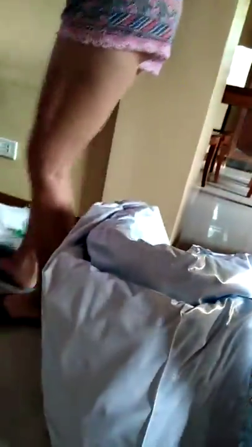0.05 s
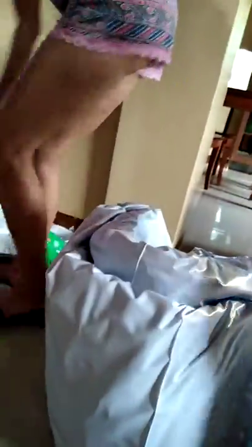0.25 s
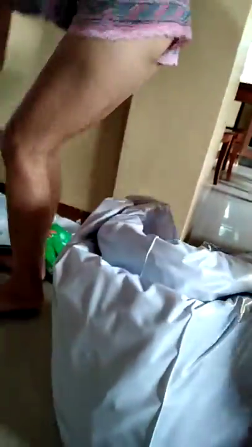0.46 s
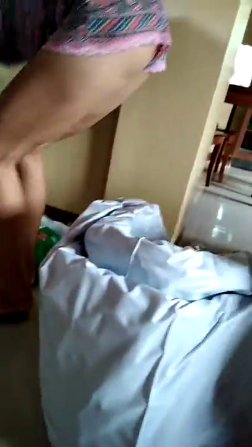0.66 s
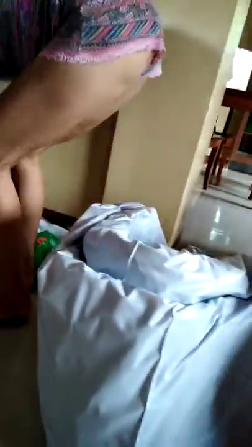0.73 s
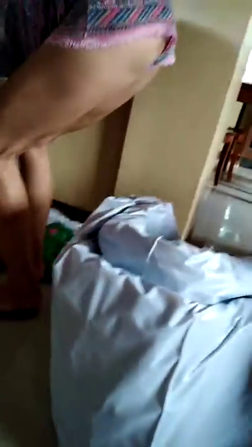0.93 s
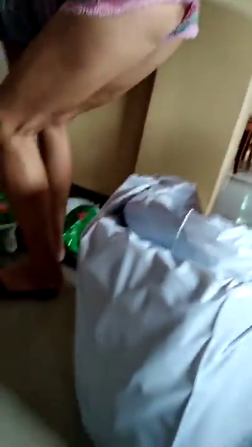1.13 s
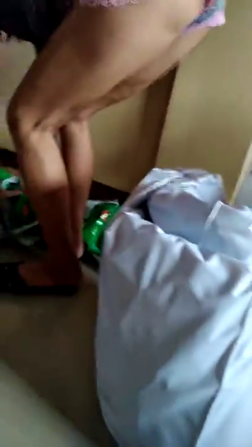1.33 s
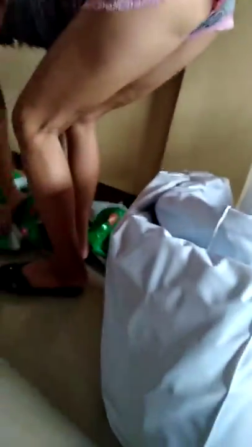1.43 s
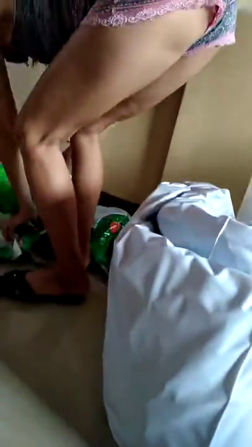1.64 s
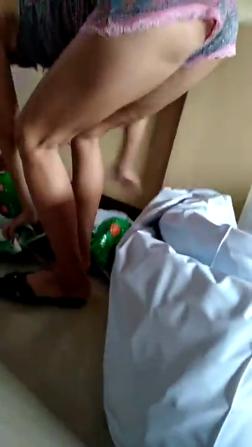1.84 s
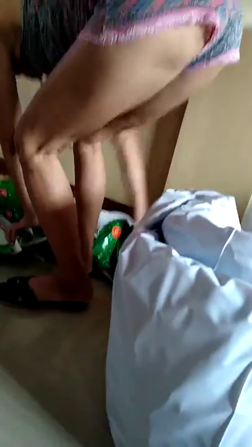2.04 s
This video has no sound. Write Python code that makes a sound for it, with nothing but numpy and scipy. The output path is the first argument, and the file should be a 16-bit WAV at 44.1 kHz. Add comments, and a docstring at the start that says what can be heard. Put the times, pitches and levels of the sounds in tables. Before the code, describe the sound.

Thick folded plastic crackles brightly from the start, with a sharp, ringing snap and low thump at 0.21 s. A smaller rustle around 0.4-0.5 s dies to near silence by 0.65 s; a faint tap at 0.72 s. From 0.83 s a long crinkling drag swells, loudest at 1.05-1.45 s with crease clicks and soft flops, a low wobble near 1.5-1.65 s, then thins, with a last click at 2.0 s. Close, short hard-room reflections, faint rumble.

```python
"""A bright crackling rustle of thick folded plastic in a tiled room, then a sharp ringing snap.
The rustle dies to near silence, a faint tap sounds, and it returns as a long drag with creases,
soft thumps and one low wobble. Rustle, snap, creases and rumble are shaped noise with crackles in
the rustle; thumps, wobble, tap and the fold's ringing are sines. Short reflections colour the
rustle and the snap; a faint low rumble lies under everything."""
import sys
import numpy as np
from scipy import signal
from scipy.fft import rfft, irfft
from scipy.io import wavfile
from scipy.ndimage import uniform_filter1d

SR = 44100
rng = np.random.default_rng(int(sys.argv[2]) if len(sys.argv) > 2 else 0)


def int16_out(signal):
    """Quantize to a 16-bit WAV file."""
    q = np.round(np.clip(np.atleast_2d(signal).T, -1, 1) * 32767)
    wavfile.write(sys.argv[1], SR, q.astype(np.int16))


N = 91728
T = np.arange(N) / SR
HZ = np.fft.rfftfreq(N, 1 / SR)
BASS_HZ = 500

# colour of the plastic sheet: freq_hz, relative_db_per_hz
SHEET_COLOUR = [(59, -52.5), (100, -20), (151, 3), (307, 0), (386, -11.5), (428, -8.5), (516, -11),
                (648, -1.5), (1040, -9), (1830, -3.5), (3270, -11), (8690, 1), (14300, -21.5)]


def amp(db):
    """Decibels to gain."""
    return 10 ** (np.asarray(db) / 20)


def evened(x):
    """Scales to rms 1."""
    return x / np.sqrt(np.mean(x ** 2) + 1e-20)


def read(points, hz):
    """Interpolates a table on a log-frequency axis."""
    f, value = np.transpose(points)
    return np.interp(np.log(hz + 1), np.log(f + 1), value)


def struck(start_s, rise_s, t60_s):
    """Envelope: linear rise times exponential decay."""
    since_s = np.maximum(T - start_s, 0)
    return np.minimum(since_s / rise_s, 1) * amp(-60 * since_s / t60_s)


def ports(pair, gain):
    """Colours two noise streams and blends them as two microphones hear them."""
    # left-right likeness: freq_hz, likeness_0_to_1
    likeness = [(60, 0.4), (150, 1), (380, 0.79), (940, 0.35), (2350, 0.27), (5870, 0), (14700, 0.46)]
    # left minus right: freq_hz, difference_db
    side_tilt = [(60, -2), (92, 4), (140, 0), (210, 7), (330, 2.5), (500, 3), (760, 1), (1160, 7.5),
                 (1770, 5), (2700, 1.5), (4130, 1.5), (6300, -2), (9620, 10), (14700, 14.5)]
    a, b = rfft(pair) * gain
    same = np.clip(read(likeness, HZ), -1, 1)
    tilt = amp(read(side_tilt, HZ) / 2)
    left = a * tilt
    right = (same * a + np.sqrt(1 - same ** 2) * b) / tilt
    return irfft([left, right], N)


def walls():
    """Direct sound plus decaying close reflections, as a frequency response per side."""
    echo_t60_s, echo_db, first_echo_s = 0.15, 2.25, .002
    t = T[:12000]
    tail = rng.standard_normal((2, 12000)) * amp(-60 * t / echo_t60_s) * (t > first_echo_s)
    return 1 + amp(echo_db) * rfft(tail / np.linalg.norm(tail[0]), N)


def rustle():
    """Small crackles over a diffuse wash, patchy and flickering, levelled in three bands."""
    # band levels over time: time_s, treble_db, middle_db, bass_db
    band_levels = [
        [(0.0, -22.5, -30.5, -85), (0.014, -25, -38, -54), (0.05, -23.5, -40.5, -73),
         (0.078, -28.5, -35.5, -49), (0.098, -27, -40.5, -60), (0.132, -32, -41.5, -59),
         (0.15, -36, -30.5, -38), (0.162, -31, -38.5, -48), (0.172, -33.5, -28.5, -57), (0.19, -38.5, -40, -67),
         (0.2, -35, -42.5, -48.5)],
        [(0.3, -51, -27.5, -44), (0.318, -49, -40, -50), (0.35, -46, -42, -52), (0.384, -34, -40, -56),
         (0.416, -35, -46, -51), (0.432, -29.5, -42, -48), (0.448, -38.5, -37, -43.5),
         (0.49, -42.5, -48.5, -56), (0.512, -48.5, -49.5, -57.5), (0.596, -54, -64, -64),
         (0.62, -59.5, -70, -79)],
        [(0.64, -56, -85, -62), (0.65, -57.5, -80, -75)],
        [(0.75, -82.5, -79.5, -77.5), (0.812, -83, -83, -101)],
        [(0.826, -31.5, -37, -61), (0.832, -36, -43, -54.5), (0.868, -37, -42, -40.5),
         (0.936, -32.5, -36.5, -48), (1.034, -26, -38, -48.5), (1.048, -26, -30, -57), (1.07, -22.5, -34, -49),
         (1.192, -23, -28, -39), (1.214, -23.5, -38.5, -43), (1.226, -23.5, -33.5, -43),
         (1.254, -29.5, -29, -37), (1.298, -25.5, -30.5, -41.5), (1.378, -23.5, -29.5, -31),
         (1.4, -23, -31, -41)],
        [(1.42, -27, -36, -35.5), (1.436, -25.5, -39, -52), (1.446, -27, -29.5, -44), (1.49, -30, -40, -41.5),
         (1.65, -29, -30, -45), (1.696, -35.5, -38.5, -39), (1.716, -33, -38, -47), (1.792, -41, -44, -51),
         (1.814, -42, -38.5, -47), (1.828, -46.5, -43.5, -50.5), (1.966, -46, -51, -60.5),
         (2.004, -38, -43.5, -59), (2.032, -46, -47, -64), (2.08, -46.5, -48, -70)],
    ]
    treble_hz, low_cut_hz = 4000, 163.0
    crackle_db, patch_db, flicker_db = -1.5, 0.5, 0.5
    shifts_per_s = 0.881  # the moving sheet trades one reflection pattern for another

    drive = rng.standard_normal((2, N)) + amp(crackle_db) * crackles()
    z = signal.stft(drive, nperseg=256, noverlap=192)[2]
    patches = rng.standard_normal(z.shape[:0:-1])  # frames by frequencies
    patches = uniform_filter1d(uniform_filter1d(patches, 30, 0), 6, 1)
    patches = evened(patches).T
    flicker = evened(uniform_filter1d(rng.standard_normal(z.shape[2]), 14))
    z = z * amp(patch_db * patches + flicker_db * flicker)
    drive = signal.istft(z, nperseg=256, noverlap=192)[1][:, :N]

    echoed = np.zeros((2, N))
    for k in range(3):
        weight = np.cos(np.pi * (shifts_per_s * T + k / 3))
        echoed += irfft(rfft(drive * weight) * walls(), N)

    bass = 1 / (1 + (HZ / BASS_HZ) ** 4)
    treble = 1 - 1 / (1 + (HZ / treble_hz) ** 4)
    low_cut = HZ ** 4 / (HZ ** 4 + low_cut_hz ** 4)
    bands = treble, 1 - treble - bass, bass * low_cut
    time_s, *levels_db = np.vstack(band_levels).T
    colour = amp(read(SHEET_COLOUR, HZ))
    out = np.zeros((2, N))
    for band, level_db in zip(bands, levels_db):
        out += evened(ports(echoed, colour * band)) * amp(np.interp(T, time_s, level_db))
    return out


def crackles():
    """Sparse small buckles, each ringing a few cycles at one of 40 pitches."""
    rate_per_s, spread_db, cycles_to_60_db_down = 700, 3, 22.8
    size = amp(spread_db * np.minimum(rng.exponential(1, (2, N)), 2.5))
    size = size * (rng.random((2, N)) < rate_per_s / SR)
    kind = rng.integers(0, 40, (2, N))
    t, out = T[None, :3000], np.zeros((2, N))
    for k, hz in enumerate(np.geomspace(300, 12000, 40)):
        ring = hz * amp(-60 * t * hz / cycles_to_60_db_down) * np.sin(2 * np.pi * hz * t)
        out += signal.oaconvolve(size * (kind == k), ring, axes=1)[:, :N]
    return evened(out)


def snap():
    """A fold lets go: a dense noise crack, the room's tail, and the stiff fold ringing in damped modes."""
    # colour of the snap: freq_hz, relative_db_per_hz
    snap_colour = [(59, -40.5), (100, -50), (244, -8.5), (428, -8), (505, -14.5), (596, -7.5), (942, -8.5),
                   (1070, -9), (1180, -15.5), (1550, -5.5), (2120, -7), (2610, -9.5), (3790, -12.5),
                   (4470, -14), (6230, -8), (7830, -3), (14300, -36)]
    # modes of the stiff fold: pitch_hz, level_db (before the side gains), t60_s
    fold_modes = [(636, -23.5, .1), (823, -19, .1), (1514, -20.5, 0.14), (1705, -25, 0.074),
                  (2030, -18, 0.12), (2402, -25, 0.072)]
    start_s, rise_s, room_t60_s, noise_db = .2085, 0.0035, .36, -11
    crack_s, crack_db = .011, 5.5  # extra level at the onset

    noise = evened(ports(rng.standard_normal((2, N)), amp(read(snap_colour, HZ)) * walls()))
    since_s = np.maximum(T - start_s, 0)
    crack = 1 + (amp(crack_db) - 1) / (1 + (since_s / crack_s) ** 4)
    rings = np.zeros(N)
    for hz, db, t60_s in fold_modes:
        rings += amp(db) * struck(start_s, rise_s, t60_s) * np.sin(2 * np.pi * hz * (T - start_s))
    side_gain = amp([[2.5], [-2.5]])
    return rings * side_gain + amp(noise_db) * noise * crack * struck(start_s, rise_s, room_t60_s)


def creases():
    """Single folds click: a short wide noise burst, a broad ring of its own and a weak tail."""
    # folds: start_s, level_db (before trim_db), ring_pitch_hz, t60_s, ring_over_burst_db
    folds = [(.1498, -20, 2110, .033, -1), (.1706, -26, 8800, .034, -1), (.4424, -28, 9100, 0.077, 6),
             (0.6283, -46.5, 7500, 0.026, 13.5), (0.6288, -45.5, 10600, .03, 14),
             (.8774, -22.5, 6420, 0.034, -1.5), (.9188, -22, 1560, .047, -1),
             (.9265, -21.5, 4470, .03, 2.5), (1.0447, -18, 1700, 0.073, -5), (1.2085, -9, 8420, 0.041, -10),
             (1.2328, -14.5, 8200, 0.05, -7), (1.2527, -10, 8000, 0.026, -16),
             (1.2638, -7.5, 8210, 0.017, -22), (1.3318, -15, 8950, 0.08, -17),
             (1.3662, -16.5, 780, 0.039, 2.5), (1.3817, -15, 8600, .016, -2.5),
             (1.4448, -23, 8870, .05, -14), (1.5053, -26, 1410, 0.021, 9), (1.5516, -16, 784, 0.032, -2),
             (1.621, -16.5, 8450, 0.034, -2), (1.6524, -17.5, 7850, .03, 1.5), (1.718, -20, 7700, 0.028, 4),
             (1.8081, -18, 7500, .04, -3), (1.852, -32.5, 800, 0.023, 9.5), (1.9796, -31.5, 1920, .045, -1),
             (2.004, -12, 1700, 0.019, -8)]
    trim_db, rise_s = -11, .001
    ring_half_width = 0.092  # fraction of ring pitch
    tail_db, tail_rise_s, tail_t60_s = -15, 0.0053, .35

    noise = rng.standard_normal((2, N))
    burst = evened(ports(noise, amp(read(SHEET_COLOUR, HZ)) * (HZ > BASS_HZ)))
    tail_gain = amp(tail_db)
    out = np.zeros((2, N))
    for start_s, db, hz, t60_s, ring_db in folds:
        resonance = 1 / (1 + ((HZ - hz) / (ring_half_width * hz)) ** 2)
        ring = evened(ports(noise, resonance))
        envelope = struck(start_s, rise_s, t60_s)
        envelope = envelope + tail_gain * struck(start_s, tail_rise_s, tail_t60_s)
        out += amp(db + trim_db) * (burst + amp(ring_db) * ring) * envelope
    return out


def thumps():
    """The heavy sheet flops: short damped low sines."""
    # flops: start_s, level_db (before side gains and rise), pitch_hz, t60_s
    flops = [(.008, -37.5, 240, 0.089), (0.141, -43, 250, .06), (.152, -36, 315, .06),
             (.21, -23, 247, 0.07), (.226, -14.5, 293, 0.068), (.43, -31.5, 235, 0.084),
             (.447, -27.5, 243, 0.04), (.468, -35.5, 227.7, 0.087), (.868, -28, 230, 0.049),
             (1.226, -27, 255, 0.078), (1.313, -28, 260, .1), (1.358, -42, 300, 0.064),
             (1.358, -28.5, 159, 0.21), (1.378, -31, 216.4, 0.13), (1.656, -33, 320, 0.072)]
    out = np.zeros(N)
    for start_s, db, hz, t60_s in flops:
        envelope = struck(start_s, 0.005, t60_s)
        out += amp(db) * envelope * np.sin(2 * np.pi * hz * (T - start_s))
    return out


def wobble():
    """A taut panel wobbles: a low tone with a weak octave, rising briefly, then sagging as it slackens."""
    # pitch and level: time_s, pitch_hz, level_db (fundamental rms, before side gains)
    glide = [(1.455, 175, -52), (1.477, 189.5, -33), (1.499, 180.6, -38), (1.531, 161, -35.5),
             (1.575, 163, -35.5), (1.591, 169.4, -61), (1.641, 152.3, -35.5), (1.697, 154, -63.5),
             (1.7, 151, -72)]
    time_s, hz, db = np.transpose(glide)
    phase = 2 * np.pi * np.cumsum(np.interp(T, time_s, hz)) / SR
    gate = uniform_filter1d(1. * ((T > time_s[0]) & (T < time_s[-1])), 400)  # softened edges
    tone = np.sin(phase) + amp(-19) * np.sin(2 * phase)
    return np.sqrt(2) * gate * amp(np.interp(T, time_s, db)) * tone


def tick():
    """A small hard part taps faintly in the pause: damped sines."""
    # modes: pitch_hz, level_db (relative to tap_db), t60_s
    tap_modes = [(1180, -8, .05), (1700, 0, .05), (2600, -8, .04), (3100, -11, .05)]
    start_s, tap_db = .7185, -53
    out = np.zeros(N)
    for hz, db, t60_s in tap_modes:
        out += amp(tap_db + db) * struck(start_s, 0.0027, t60_s) * np.sin(2 * np.pi * hz * T)
    return out


def rumble():
    """A faint lumpy rumble: low-passed noise with a drifting level."""
    # level over time: time_s, level_db
    rumble_level = [(0.0, -65), (0.17, -88), (0.22, -57), (0.27, -62.5), (0.56, -78), (0.58, -65.5),
                    (0.66, -50), (0.8, -73.5), (0.82, -66.5), (1.07, -76), (1.21, -64), (1.26, -78),
                    (1.39, -65), (1.73, -70), (1.75, -62), (1.82, -73.5), (2.02, -62.5), (2.08, -73)]
    # colour, before the low-pass: freq_hz, relative_db_per_hz
    rumble_colour = [(12, -66), (20, -36), (27, -30), (52, -4.5), (64, -1.5), (81, 1), (113, -10),
                     (130, -13), (170, -43), (290, -120)]
    low_pass = 1 / (1 + (HZ / 130) ** 8)
    low = ports(rng.standard_normal((2, N)), amp(read(rumble_colour, HZ)) * low_pass)
    return evened(low) * amp(np.interp(T, *np.transpose(rumble_level)))


def scene():
    """Handling sounds, high-passed as the microphones pass little of their deep bass, plus the rumble."""
    mic_hz = 106
    side_gain = amp([[1.5], [-1.5]])
    near = rustle() + snap() + creases() + (thumps() + tick() + wobble()) * side_gain
    high_pass = signal.butter(3, mic_hz, "high", fs=SR, output="sos")
    return signal.sosfilt(high_pass, near) + rumble()


def record(dry):
    """Rounds peaks off towards full scale, then low-passes."""
    edge_hz = 14250
    rounded = np.tanh(dry ** 3 / 3 + dry)
    low_pass = signal.firwin(511, edge_hz, window=("kaiser", 9), fs=SR)
    return signal.oaconvolve(rounded, low_pass[None], "same", axes=1)


dry = scene()
out = record(dry)
int16_out(out)
```